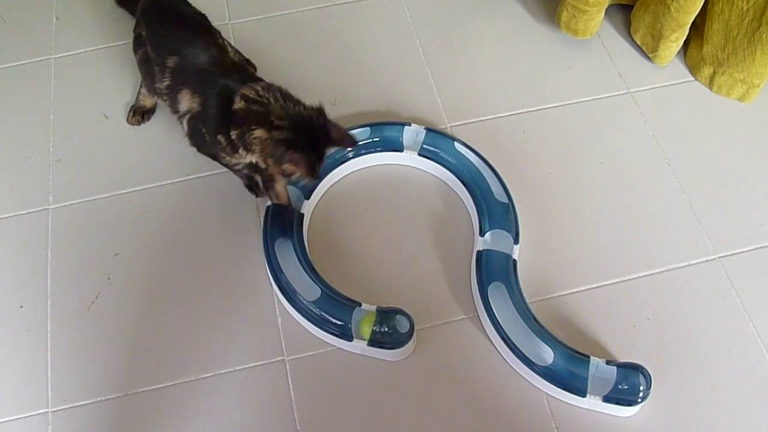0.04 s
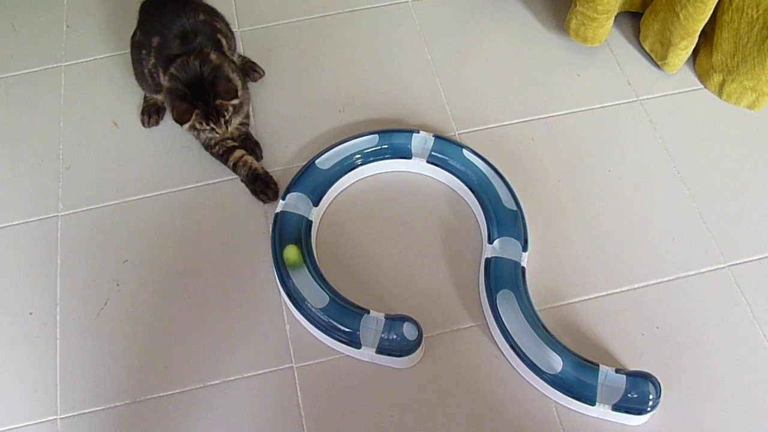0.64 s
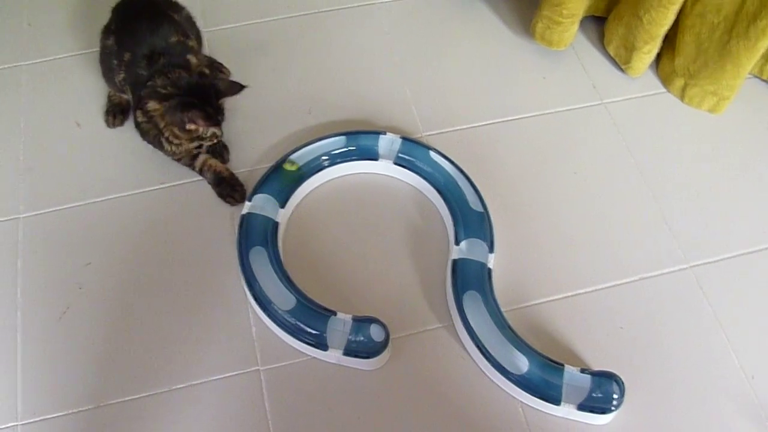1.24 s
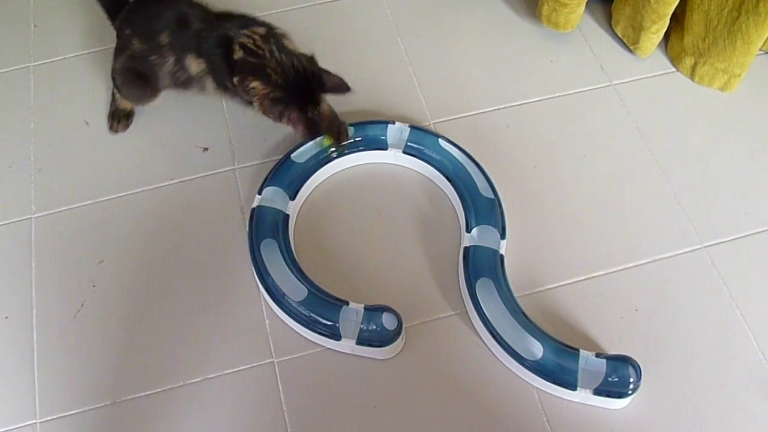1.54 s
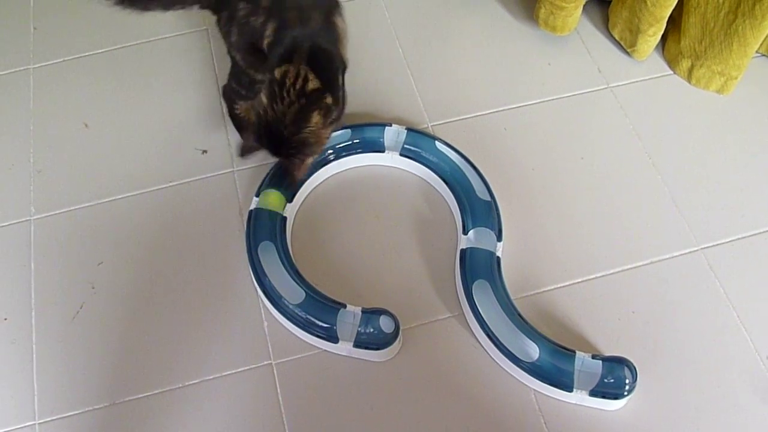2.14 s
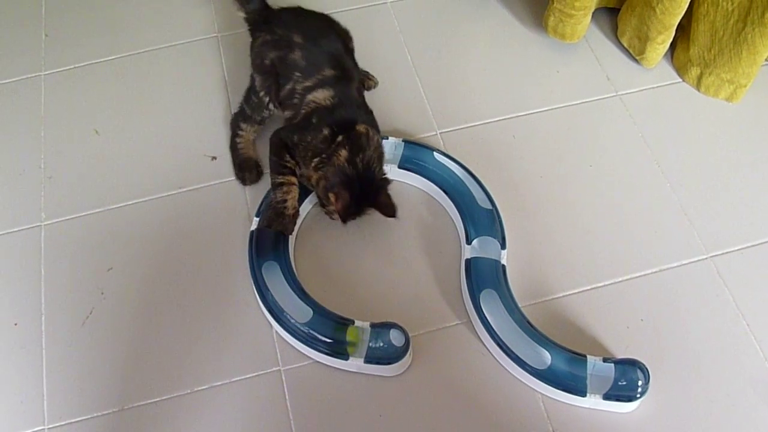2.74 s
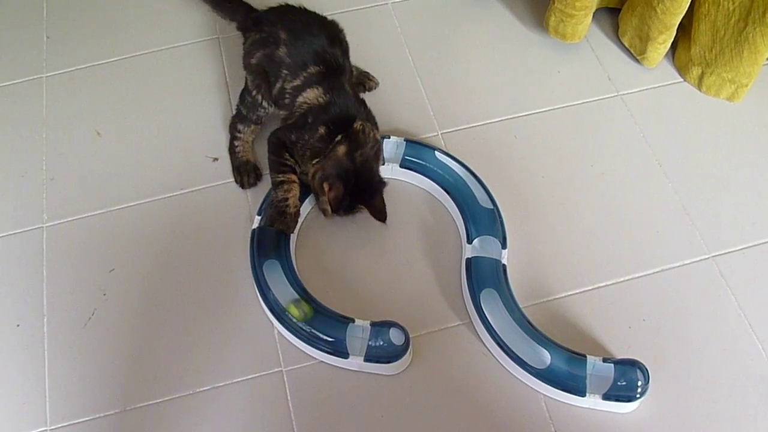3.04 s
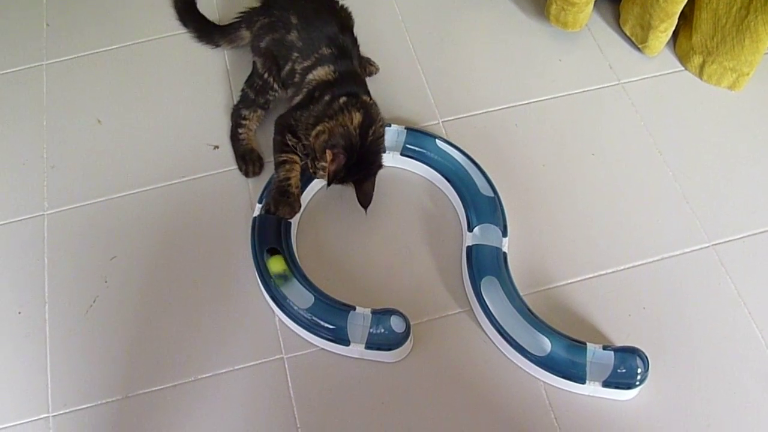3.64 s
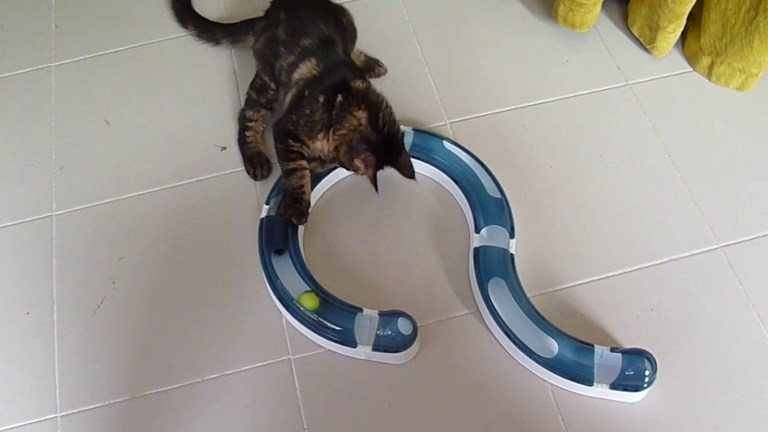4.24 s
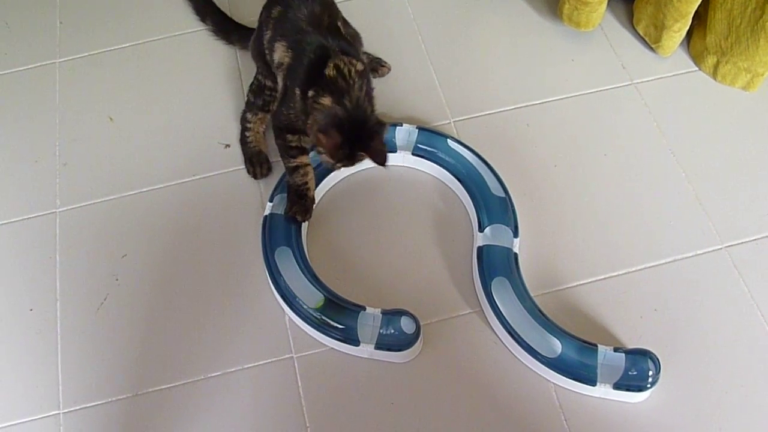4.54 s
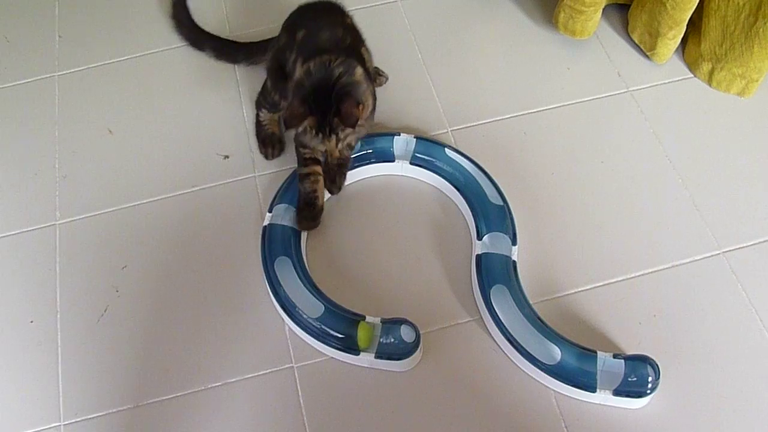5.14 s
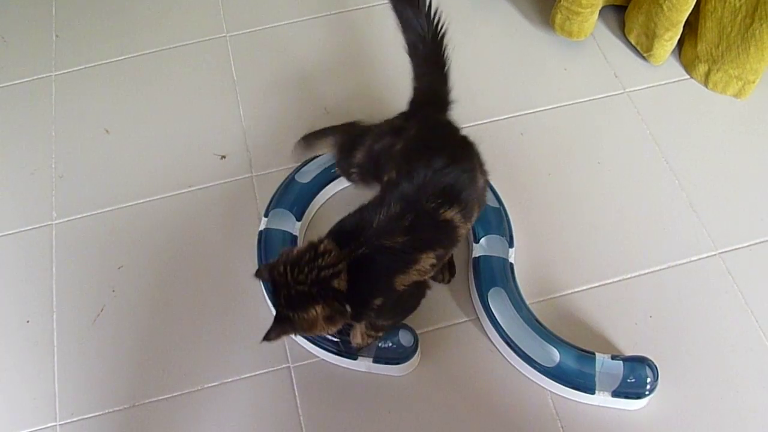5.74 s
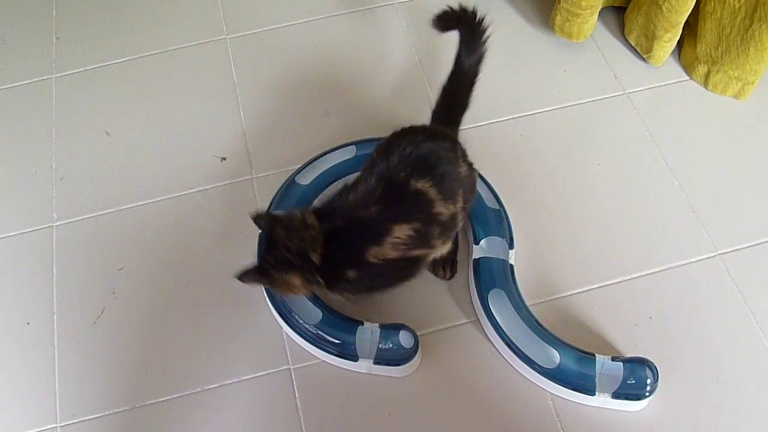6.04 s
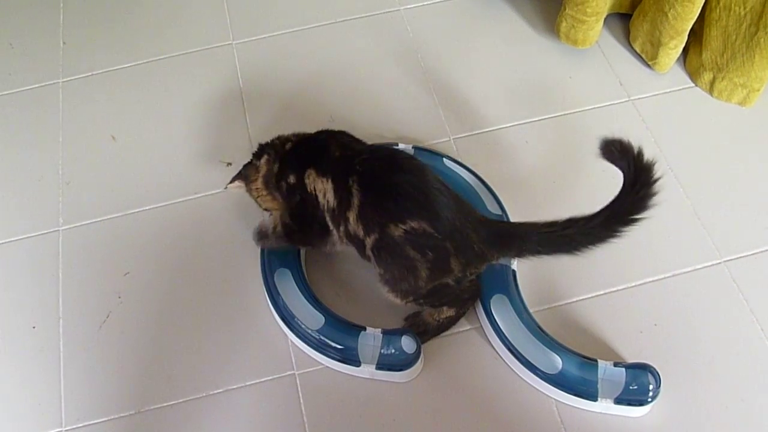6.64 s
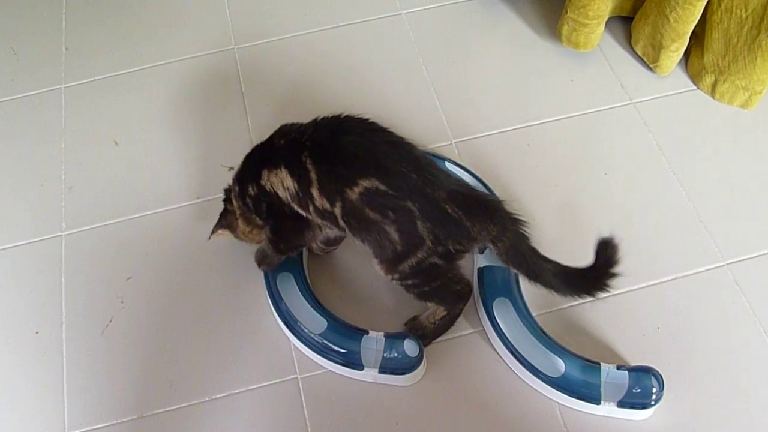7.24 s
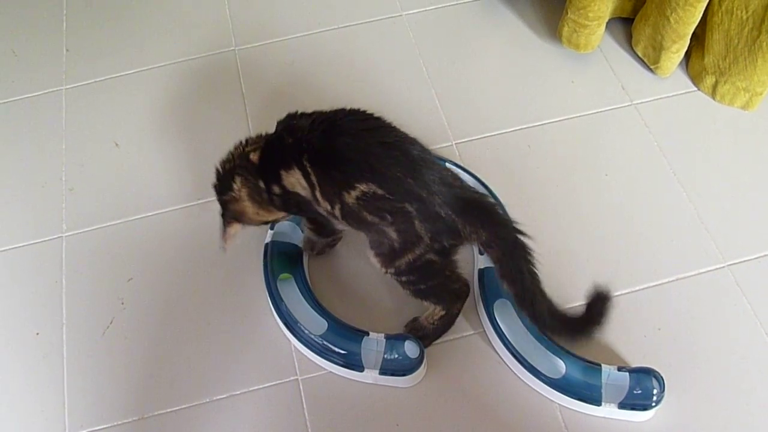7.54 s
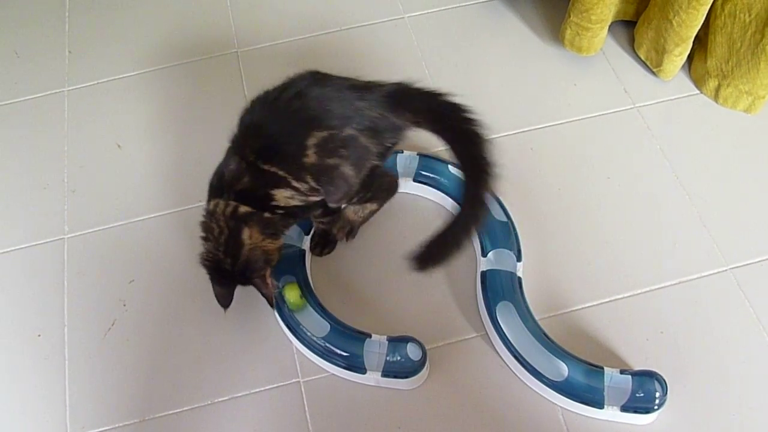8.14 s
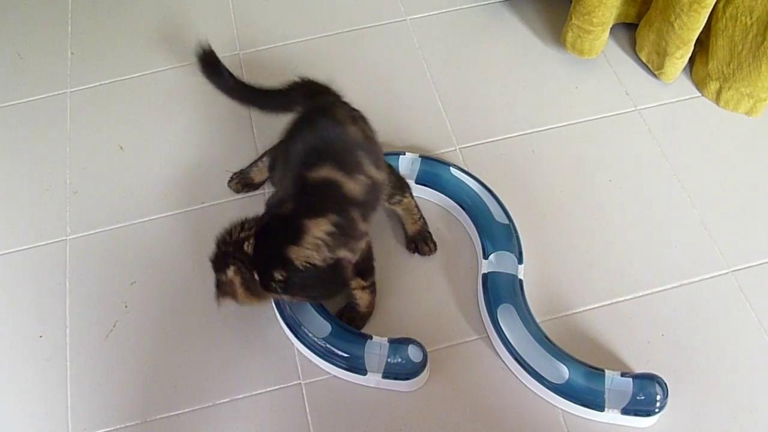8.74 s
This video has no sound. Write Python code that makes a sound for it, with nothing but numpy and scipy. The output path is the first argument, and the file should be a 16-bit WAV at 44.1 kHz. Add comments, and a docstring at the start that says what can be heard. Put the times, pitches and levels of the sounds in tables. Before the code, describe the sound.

Hollow plastic clattering and a rolling ball come in bursts as a cat plays with a track toy on a tiled floor.

```python
"""A light ball, batted by a cat, rumbles along a hollow plastic toy track and knocks on joints and caps.
Each contact rings the modes of the plastic shell. The cat's steps rattle the sections and scrape them
on the tiled floor; paws thump, claws and lid edges click, one slip squeaks.
A small hard room rings after each knock, over steady hiss, rumble and faint passing hums."""
import sys
import numpy as np
from scipy import signal
from scipy.fft import rfft, irfft
from scipy.io import wavfile

SR = 44100
rng = np.random.default_rng(int(sys.argv[2]) if len(sys.argv) > 2 else 0)


def wav_record(signal):
    """Record a signal, one row per channel, as 16-bit PCM in the file named by sys.argv[1]."""
    frames = np.transpose(np.atleast_2d(signal))
    bounded = np.clip(frames, -1, 1)
    # unit amplitude maps onto the largest positive 16-bit level
    quanta = np.round(bounded * 32767).astype(np.int16)
    wavfile.write(sys.argv[1], SR, quanta)


N = 388080

# plastic shell modes: pitch_hz, level_db, faint_ring_t60_s
SHELL_MODES = [(279.7, -15.5, .12), (387, -12.5, 0.044), (457, -13.5, .15), (552, -15.5, 0.31),
               (647, -5.5, .2), (721, -3.5, 0.35), (779, -7.5, 0.085), (872, -7, .15), (922, -9.5, .15),
               (994, -6.5, 0.12), (1105, -13, 0.36), (1168, -4.5, 0.11), (1260, -8.5, 0.24),
               (1320, -5, 0.095), (1363, -3.5, 0.24), (1472, -3.5, 0.62), (1608, -7, 0.21),
               (1667, -12, 0.2), (1744, -8.5, 0.23), (1922, -9, 0.1), (2084, -8, .15), (2324, -7.5, .15),
               (2507, -11, 0.18), (2588, -9, .1), (2733, -11, 0.2), (2814, -14, .1)]
# ring, thud, crack and snap bands of a strike: low_hz, high_hz
STRIKE_BANDS = [(858, 1860), (264, 896), (2110, 3950), (3980, 7500)]
# ball runs: start_s, length_s, level_db
BALL_ROLLS = [(0, 0.22, -52), (.27, 0.95, -52.5), (1.55, 0.74, -52), (2.12, 0.52, -45), (2.85, 0.77, -56),
              (4.12, 0.57, -57), (5.4, 0.35, -53.5), (6.05, 0.21, -58), (6.65, 0.22, -57), (7.95, .5, -72),
              (8.55, .3, -52.5)]
# cat pushes the track: start_s, length_s, rattle_db, scrape_db
TRACK_PUSHES = [(0.016, 0.15, -52.5, -63), (.3, 0.19, -57.5, -77), (1.582, 0.047, -48, -53.5),
                (1.685, 0.064, -55.5, -61), (1.897, 0.096, -51, -65), (2.04, 0.088, -49, -54),
                (2.116, 0.13, -40.5, -42.5), (2.252, .15, -42.5, -56.5), (2.462, 0.029, -38, -48),
                (2.54, 0.14, -49, -51.5), (4.076, 0.033, -63, -62.5), (5.377, 0.065, -42, -46),
                (5.447, 0.078, -55, -49), (5.508, 0.12, -46.5, -54.5), (5.936, 0.059, -54.5, -68),
                (6.375, .045, -40, -58), (6.69, 0.093, -67, -60.5), (7.175, 0.027, -58.5, -66),
                (8.456, 0.016, -47, -37), (8.513, 0.12, -45.5, -46.5), (8.648, 0.041, -39, -42.5),
                (8.725, 0.055, -41.5, -57)]
# paw landings: start_s, level_db
PAW_STEPS = [(.085, -46), (1.484, -44), (4.135, -47), (5.425, -35), (8.25, -38.5), (8.739, -46)]
# ball hits joints, walls and end caps: start_s, ring_db, thud_rel_db, crack_rel_db, favoured_hz
BALL_KNOCKS = [(0.156, -42.5, -5, -17, 1380), (0.288, -49.5, 0, -25, 1380), (0.356, -48, -11, -17, 1340),
               (0.477, -47.5, -6, -18, 1350), (0.508, -43.5, 0, -19, 1370), (0.541, -31.5, -13, -16, 1360),
               (0.555, -39.5, -5, -14, 1480), (1.612, -39, -5, -12, 1320), (1.695, -40.5, -14, -13, 1410),
               (1.876, -20, -8, -7.5, 1305), (1.892, -30.5, -8, -14, 1320), (2.134, -34.5, 0.5, -0.5, 1710),
               (2.152, -36, -12, -15, 1150), (2.188, -28.5, 0.5, -3, 1320), (2.219, -34, -3, -24, 1620),
               (2.235, -27.5, -3.5, -5.5, 1480), (2.355, -34.5, -4, -10, 1430),
               (2.437, -38, -4.5, -11, 1450), (2.531, -29.5, -10, -3, 1680), (2.56, -30, -8, -5, 1610),
               (2.636, -37.5, 1, -15, 1770), (2.712, -40.5, -0.5, -8, 1780),
               (3.561, -28, -2.5, -11.5, 1454), (4.37, -54, -10, -14, 1270), (5.152, -42, -11, -5.5, 1380),
               (5.371, -33.5, -12, -13, 1210), (5.382, -31.5, -5, -18, 1010),
               (5.394, -19, -16.5, -11, 1390), (5.414, -29, -20, -20, 1580), (5.704, -41, -6, -18, 980),
               (6.108, -36, -19, -13, 1310), (6.139, -34.5, -2.5, -11, 1400), (6.366, -36, -4, -4.5, 1590),
               (6.398, -33.5, -5, -15, 1490), (8.56, -27, -12, -23, 1300), (8.62, -34, -20, -8, 1400),
               (8.756, -28.5, -10, -14, 1265), (8.781, -25.5, -25, -13.5, 1470)]
# one slip: start_s, length_s, from_hz, to_hz, level_db
SLIP_SQUEAK = (.979, .024, 2900, 5200, -49.5)
# claw and lid-edge ticks: start_s, crack_db, ring_rel_db, snap_rel_db
CLAW_CLICKS = [(1.481, -54, 1.5, -10), (1.979, -46, 5, -9.5), (2.014, -41, -2, -18), (2.124, -37, -3, -4.5),
               (2.461, -38.5, 3, -11), (2.618, -30.5, -2.5, -15.5), (3.176, -59, 5, -4),
               (4.783, -58.5, 1, -12), (5.534, -41, -8, -11), (5.733, -51.5, 4, -15),
               (6.242, -40.5, -4, -26), (6.312, -52, -11, -12), (6.333, -49, 3, -20),
               (6.675, -50.5, -1, -16), (6.723, -47, -10, -15), (6.93, -49.5, 2.5, -8),
               (7.628, -52, -1, -8.5), (8.431, -56.5, 7, 1), (8.459, -47, 2, -2)]
# low hums: start_s, end_s, pitch_hz, level_db
LOW_HUMS = [(0, 1.6, 81, -62), (2.3, 4.1, 58, -63), (7.9, 11, 82, -64)]
# spectral shapes of roll, background, rattle and scrape: freq_hz, density_rel_db
ROLL_SPECTRUM = [(30, -30.5), (130, 7), (300, 5), (700, 1), (1400, -3), (2200, -5.5), (4000, -19),
                 (9000, -34)]
BACKGROUND_SPECTRUM = [(15, -54.5), (30, -33.5), (45, -17), (64, -20.5), (112, -18), (200, -16.5),
                       (350, -18), (520, -23), (720, -22), (950, -23.5), (1200, -27), (2500, -33.5),
                       (6800, -38.5), (8500, -42.5)]
RATTLE_SPECTRUM = [(40, -45), (150, -16), (300, -0.5), (700, -6.5), (1400, 4.5), (2100, 8), (3000, -2),
                   (5000, -7.5), (9000, -25.5)]
SCRAPE_SPECTRUM = [(40, -57.5), (300, -31), (1000, -12.5), (2000, 4), (2600, 8.5), (3500, 1.5), (4600, 0.5),
                   (7000, -4), (9000, -15)]
# room decay: freq_hz, t60_s
ROOM_DECAY = [(200, 0.51), (700, 0.42), (1500, 0.31), (3000, 0.34), (8000, 0.17)]

BLOW_LENGTH_S = 0.16
PUSH_SHAPE = dict(attack_s=0.0076, sag_db_per_s=9.5, release_db_per_s=296.5)


def from_db(db):
    """Decibels to gain."""
    return 10 ** (np.asarray(db) / 20)


def unit_rms(x):
    """Scale to rms 1."""
    return x / np.sqrt(np.mean(x ** 2) + 1e-20)


def unit_energy(x):
    """Scale to energy 1."""
    return x / np.sqrt(np.sum(x ** 2) + 1e-20)


def at_hz(table, hz):
    """Interpolate on a log-frequency axis."""
    freq_hz, values = np.transpose(table)
    return np.interp(np.log(np.maximum(hz, 1)), np.log(freq_hz), values)


def band(x, low_hz, high_hz, order=2):
    """Causal band-pass."""
    return signal.sosfilt(signal.butter(order, [low_hz, high_hz], "band", fs=SR, output="sos"), x)


def coloured(x, spectrum):
    """Filter by a spectral shape; rms 1."""
    gain = from_db(at_hz(spectrum, np.fft.rfftfreq(N, 1 / SR)))
    return unit_rms(irfft(rfft(x) * gain, N))


def decay(t, t60_s):
    """Fall of 60 dB per t60_s."""
    return np.exp(-np.log(1000) * t / t60_s)


def add(out, start_s, sound):
    """Mix in at start_s."""
    at = int(start_s * SR)
    out[at:at + len(sound)] += sound


def strokes(rows, attack_s, sag_db_per_s, release_db_per_s):
    """Envelope of strokes summed in power: each rises, sags, then dies away."""
    age_s, power = np.arange(2 * SR) / SR, np.zeros(N + 2 * SR)
    for start_s, length_s, level_db in rows:
        rise = np.minimum(age_s / attack_s, 1)
        fall_db = sag_db_per_s * age_s + release_db_per_s * np.maximum(age_s - length_s, 0)
        add(power, start_s, (rise * from_db(level_db - fall_db)) ** 2)
    return np.sqrt(power[:N])


def contacts(per_s, spread_db):
    """Tiny impacts of random time, size and sign."""
    sizes = from_db(spread_db * np.minimum(rng.exponential(1, N), 3))
    signs = rng.choice([-1, 1], N)
    return sizes * signs * (rng.random(N) < per_s / SR)


def wandering(x, new_response, hops):
    """Moving source: cross-fade through a fresh impulse response at each hop."""
    hop = N // hops + 1
    padded, out = np.pad(x, (hop, 2 * hop)), np.zeros(N + 3 * hop + SR)
    fade = signal.windows.hann(2 * hop, sym=False)
    for at in range(0, N + hop, hop):
        piece = signal.fftconvolve(padded[at:at + 2 * hop] * fade, new_response())
        out[at:at + len(piece)] += piece
    return out[hop:hop + N]


def shell_modes(median_t60_s=0.031, ring_db=-27.5):
    """The struck wall settles fast, high modes first; the rest of the track rings on faintly."""
    t = np.arange(int(BLOW_LENGTH_S * SR)) / SR
    hz, level_db, ring_t60_s = np.transpose(SHELL_MODES)[:, :, None]
    wall = decay(t, median_t60_s * np.sqrt(np.median(hz) / hz))
    track = from_db(ring_db) * decay(t, ring_t60_s)
    return from_db(level_db) * np.exp(2j * np.pi * hz * t) * (wall + track)


def shell_blow(modes, favoured_hz, focus_db=9.5, width_hz=130, spread_db=2.0, dense_db=-2.5):
    """One spot's response favours modes near one pitch; noise stands for the thin wall's dense modes."""
    hz = np.array(SHELL_MODES)[:, 0]
    boost_db = focus_db * np.exp(-((hz - favoured_hz) / width_hz) ** 2)
    strength = from_db(boost_db + spread_db * rng.standard_normal(len(hz)))
    phasors = np.exp(2j * np.pi * rng.random(len(hz)))
    ring = np.einsum("m,mt->t", strength * phasors, modes).imag
    dense = rng.standard_normal(len(ring)) * decay(np.arange(len(ring)) / SR, t60_s=0.045)
    return unit_energy(ring) + from_db(dense_db) * unit_energy(dense)


def through_shell(impacts, spectrum, envelope, modes):
    """A stream of contacts rings the shell at changing spots, each scaled to keep the stream's power."""
    tint = from_db(at_hz(spectrum, np.fft.rfftfreq(modes.shape[1], 1 / SR)))

    def spot():
        response = shell_blow(modes, favoured_hz=rng.uniform(600, 3300), focus_db=5.5, dense_db=0.5)
        power_gain = np.mean(np.abs(rfft(response) * tint) ** 2) / np.mean(tint ** 2)
        return response / np.sqrt(power_gain)
    return wandering(coloured(impacts, spectrum) * envelope, spot, hops=36)


def rolling(modes):
    """The ball's seam and bumps patter in the channel, fading as it slows."""
    envelope = strokes(BALL_ROLLS, attack_s=0.026, sag_db_per_s=5, release_db_per_s=43.5)
    return through_shell(contacts(per_s=320, spread_db=3.5), ROLL_SPECTRUM, envelope, modes)


def background(noise_db=-53, fade_s=0.12):
    """Steady room rumble and hiss; faint hums come and go."""
    t = np.arange(N) / SR
    out = from_db(noise_db) * coloured(rng.standard_normal(N), BACKGROUND_SPECTRUM)
    for start_s, end_s, pitch_hz, level_db in LOW_HUMS:
        swell = np.clip(np.minimum(t - start_s, end_s - t) / fade_s, 0, 1)
        out += from_db(level_db) * swell * np.sqrt(2) * np.sin(2 * np.pi * pitch_hz * t)
    return out


def rattling(modes, trim_db=2.5):
    """Lids and joints chatter while the track is pushed."""
    rows = [(start_s, length_s, db + trim_db) for start_s, length_s, db, _ in TRACK_PUSHES]
    force = strokes(rows, **PUSH_SHAPE)
    return through_shell(contacts(per_s=450, spread_db=1.5), RATTLE_SPECTRUM, force, modes)


def scraping(trim_db=1.0):
    """Bright stick-slip grains as the pushed track slides on the tiles."""
    rows = [(start_s, length_s, db + trim_db) for start_s, length_s, _, db in TRACK_PUSHES]
    grains = coloured(contacts(per_s=1300, spread_db=-2.5), SCRAPE_SPECTRUM)
    return grains * strokes(rows, **PUSH_SHAPE)


def paws():
    """Padded paws land with a short dull thump."""
    out, t = np.zeros(N + SR), np.arange(int(BLOW_LENGTH_S * SR)) / SR
    for start_s, level_db in PAW_STEPS:
        thump = unit_rms(band(rng.standard_normal(len(t)), low_hz=160, high_hz=600))
        add(out, start_s, from_db(level_db) * thump * decay(t, t60_s=0.081))
    return out[:N]


def strike(modes, favoured_hz, levels_db, hard_contact_hz=12000, attack_s=0.012):
    """One blow in four bands, levelled over the attack. Plastic damps the snap first; soft is duller."""
    _, _, crack_db, snap_db = levels_db
    blow = shell_blow(modes, favoured_hz)
    corner_hz = np.clip(hard_contact_hz * from_db(snap_db - crack_db), 2000, hard_contact_hz)
    snap = signal.lfilter(*signal.butter(2, corner_hz, fs=SR), blow)
    snap *= decay(np.arange(len(blow)) / SR, t60_s=0.028)
    out = np.zeros(len(blow))
    for source, edges_hz, level_db in zip((blow, blow, blow, snap), STRIKE_BANDS, levels_db):
        part = band(source, *edges_hz, order=3)
        out += from_db(level_db) * part / np.std(part[:int(attack_s * SR)])
    return out


def knocks(modes, thud_trim_db=-2.0, crack_trim_db=-0.5, rebound_s=0.018, rebound_loss_db=15):
    """The ball hits the plastic and rebounds once; harder contacts snap more."""
    out = np.zeros(N + SR)
    for start_s, ring_db, thud_rel_db, crack_rel_db, favoured_hz in BALL_KNOCKS:
        snap_rel_db = -7 + 1.57 * crack_rel_db
        balance_db = [0, thud_rel_db + thud_trim_db, crack_rel_db + crack_trim_db, snap_rel_db]
        levels_db = ring_db + np.array(balance_db)
        add(out, start_s, strike(modes, favoured_hz, levels_db))
        again_s = start_s + rebound_s * rng.uniform(0.85, 1.15)
        add(out, again_s, strike(modes, favoured_hz, levels_db - rebound_loss_db))
    return out[:N]


def squeak():
    """A brief rough slip; pitch shoots upward."""
    start_s, length_s, from_hz, to_hz, level_db = SLIP_SQUEAK
    progress = np.clip((np.arange(N) / SR - start_s) / length_s, 0, 1)
    pitch_hz = from_hz + (to_hz - from_hz) * progress ** 2
    jitter_rad = 0.5 * unit_rms(band(rng.standard_normal(N), low_hz=100, high_hz=900))
    envelope = 2 * np.sin(np.pi * progress) * (1 - progress)
    return from_db(level_db) * envelope * np.sin(2 * np.pi * np.cumsum(pitch_hz) / SR + jitter_rad)


def clicks(modes, favoured_hz=1550, thud_below_ring_db=10, crack_trim_db=1.0, snap_trim_db=4.5):
    """Claws and lid edges tick on the plastic: sharp, little bass."""
    out = np.zeros(N + SR)
    for start_s, crack_db, ring_rel_db, snap_rel_db in CLAW_CLICKS:
        thud_rel_db = ring_rel_db - thud_below_ring_db
        balance_db = [ring_rel_db, thud_rel_db, crack_trim_db, snap_rel_db + snap_trim_db]
        add(out, start_s, strike(modes, favoured_hz, crack_db + np.array(balance_db)))
    return out[:N]


def room(x, wet_db=-3.5, first_wall_s=0.0063, build_s=0.00085):
    """Tile and wall reflections build to a tail that varies with place; treble dies sooner."""
    t = np.arange(int(0.4 * SR)) / SR
    edges_hz = np.geomspace(150, 10000, 6)
    onset = 1 - np.exp(-np.maximum(t - first_wall_s, 0) / build_s)

    def tail():
        echoes = np.zeros(len(t))
        for low_hz, high_hz in zip(edges_hz, edges_hz[1:]):
            t60_s = at_hz(ROOM_DECAY, np.sqrt(low_hz * high_hz))
            echoes += band(rng.standard_normal(len(t)), low_hz, high_hz) * onset * decay(t, t60_s)
        return unit_energy(echoes) * np.sqrt(2 * edges_hz[-1] / SR)   # about unity gain in band
    return from_db(wet_db) * wandering(x, tail, hops=24)


def scene():
    """The toy and its reflections, plus squeak and background; mono."""
    modes = shell_modes()
    hits = knocks(modes) + clicks(modes) + paws()
    toy = hits + rolling(modes) + rattling(modes) + scraping()
    return (toy + room(toy) + squeak() + background())[None]


def record(dry, rolloff_hz=7700, cutoff_hz=8900, dc_offset=0.0107):
    """Treble roll-off, steep cut, small DC offset."""
    soft = signal.sosfilt(signal.butter(10, rolloff_hz, fs=SR, output="sos"), dry)
    return signal.sosfilt(signal.ellip(10, 0.1, 80, cutoff_hz, fs=SR, output="sos"), soft) + dc_offset


dry = scene()
out = record(dry)
wav_record(out)
```